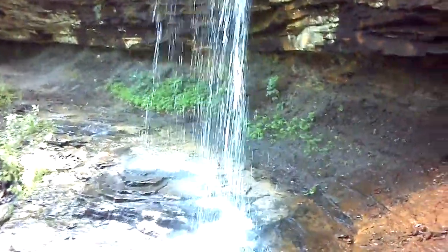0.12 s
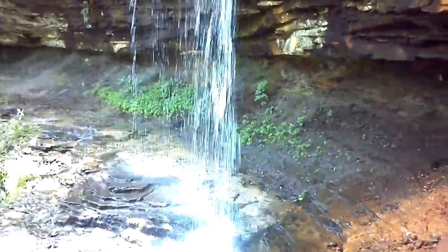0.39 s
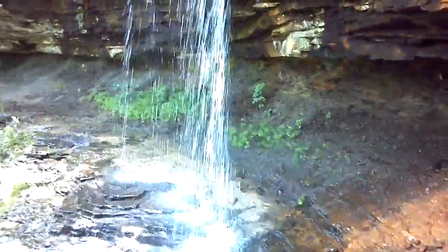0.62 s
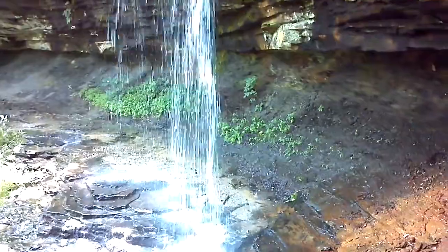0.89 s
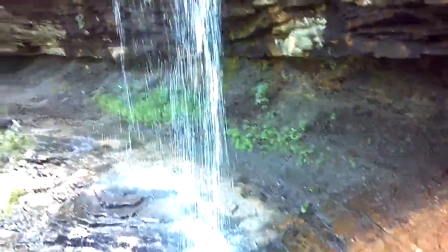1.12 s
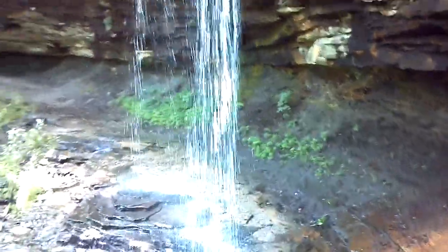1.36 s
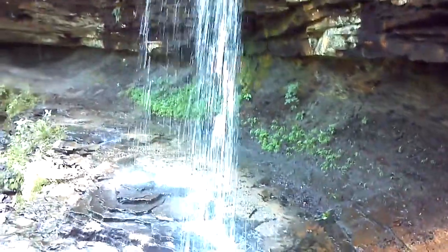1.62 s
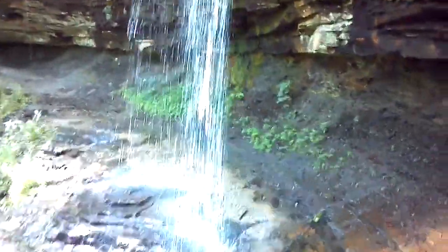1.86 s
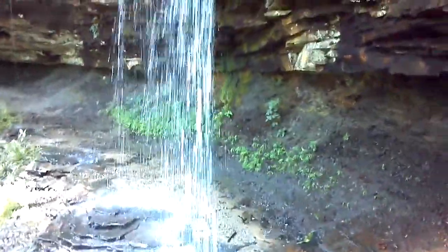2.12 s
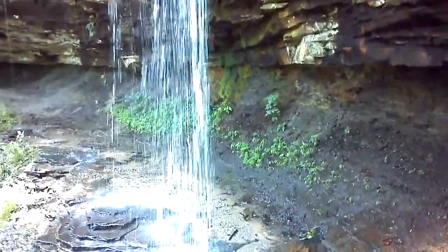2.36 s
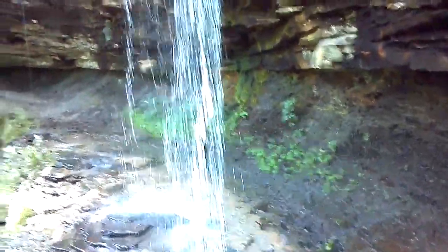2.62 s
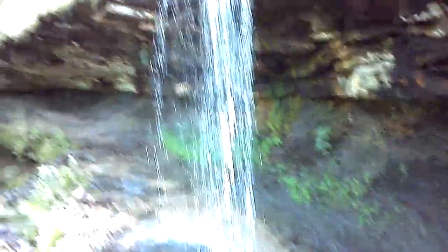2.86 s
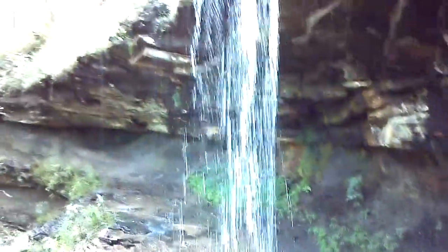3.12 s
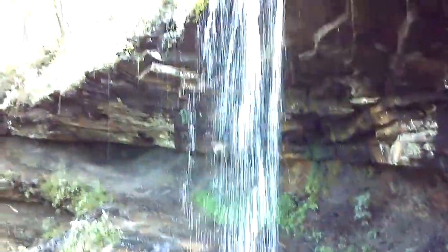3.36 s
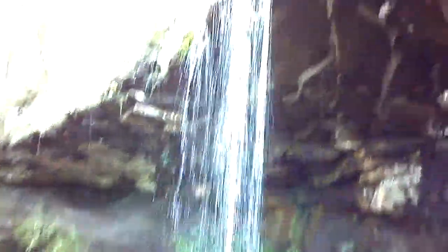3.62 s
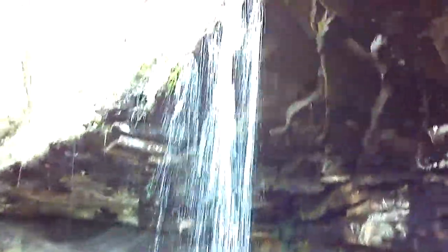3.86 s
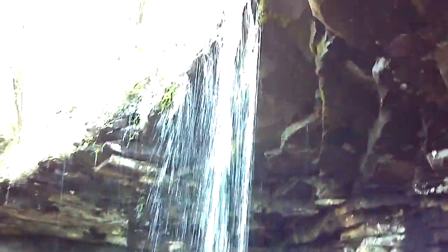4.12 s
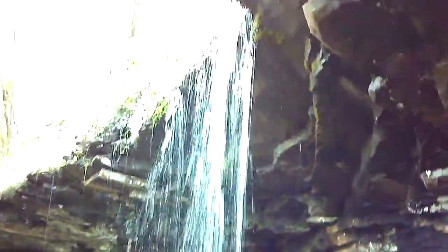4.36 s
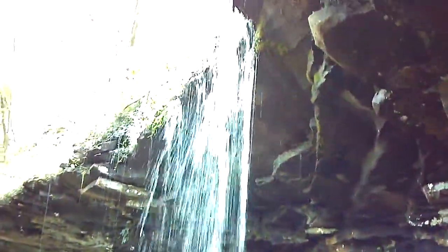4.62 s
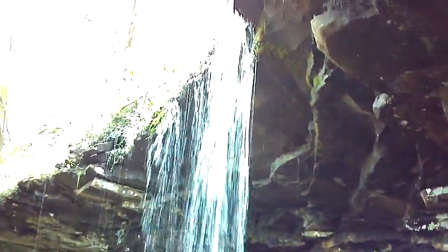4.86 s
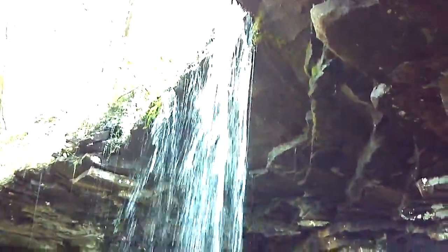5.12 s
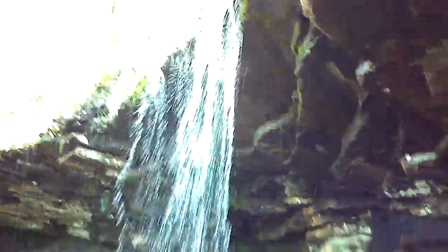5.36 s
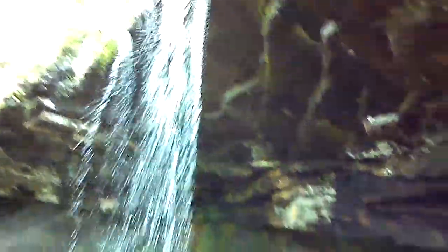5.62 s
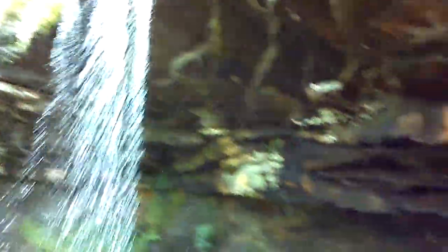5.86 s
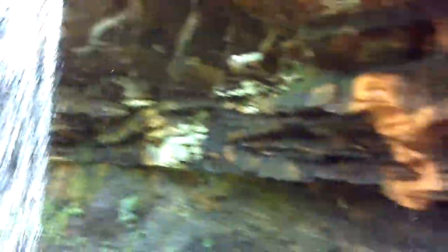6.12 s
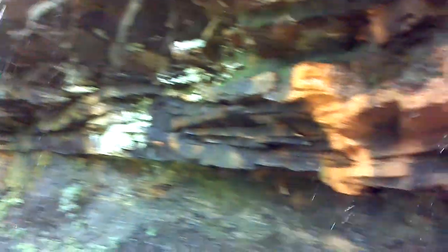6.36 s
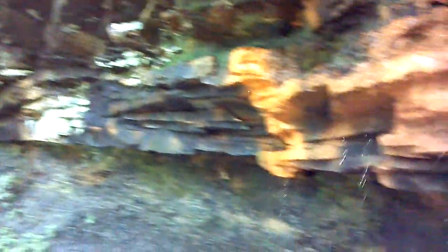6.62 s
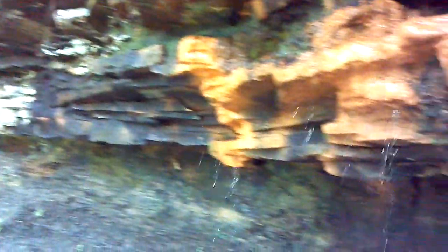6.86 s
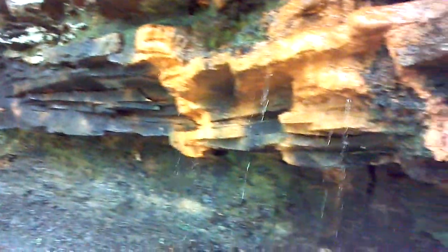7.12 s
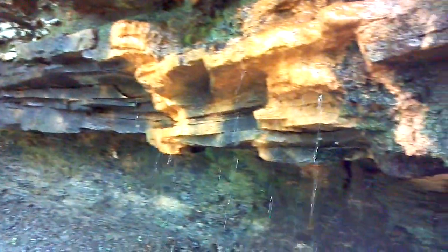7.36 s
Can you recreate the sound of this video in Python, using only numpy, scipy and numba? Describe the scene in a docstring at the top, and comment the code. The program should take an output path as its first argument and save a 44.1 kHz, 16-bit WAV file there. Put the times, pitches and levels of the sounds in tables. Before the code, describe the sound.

A thin waterfall drops onto a stone ledge under a rock overhang, a constant bright hiss of dense drops and spray. Short wet slaps land irregularly, thickest in the first half, with faint bubbly ticks and rare low glugs. The level stays nearly even, with softer slaps later. A small handheld stereo camera hears it close and very wide, with little bass.

```python
"""A steady hiss of dense drops with wet slaps on top: a thin waterfall beats on a stone ledge under an overhang.
The hiss is noise, random impacts and tiny ringing bubbles; clumps of water slap as short bursts of noise.
Large pockets of trapped air ring low as fading sines, and spray thuds on the left microphone port.
A small camera with two ports tilts up, then turns away, so the colour of the water slowly changes.
The stereo image is widened by taking each port, delayed, off the other."""
import sys
import numpy as np
from scipy import signal
from scipy.fft import rfft, irfft, next_fast_len
from scipy.io import wavfile
from scipy.ndimage import uniform_filter1d
from numba import njit

SR = 44100
rng = np.random.default_rng(int(sys.argv[2]) if len(sys.argv) > 2 else 0)


def rack_gain(trim_db):
    """Turn a fader trim in dB into the linear factor to multiply a signal by."""
    fader = np.asarray(trim_db, float)
    return 10 ** (fader / 20)


def transcribe(signal):
    """Save signal, clipped to [-1, 1], as a 16-bit WAV file at the path in sys.argv[1]."""
    frames = np.atleast_2d(signal).T
    limited = np.clip(frames, -1, 1)
    pcm = np.round(limited * 32767).astype(np.int16)
    wavfile.write(sys.argv[1], SR, pcm)


N = 330309  # samples, about 7.5 s

# How hard the water lands, slowly changing, ahead of the final gain:
# time_s, spray_level_db, heavy_splash_lift_db
WATER_FLOW = [(0, -24, -0.5), (.4, -24.5, -0.5), (1.1, -24.5, 1.5), (1.8, -24.5, 0), (2.3, -24.5, -2.5),
              (3.2, -25, 0), (4.0, -24.5, -2.5), (4.5, -25, -1), (5.2, -24.5, -0.4), (5.8, -24, -.5),
              (6.3, -24.5, 0.7), (6.9, -25.5, 1), (7.49, -25.5, 2)]
# Colour of the water at the two ports for three aims of the camera, as relative levels:
# pitch_hz, left_db, right_db, likeness (-1 to 1, how alike the ports are)
COLOUR_AIM_DOWN = [(140, -20, -19, 0.76), (210, -17.5, -20.5, 0.95), (310, -9.5, -11, .97),
                   (412, -14.5, -14, .88), (520, -17, -18.5, 0.74), (644, -10.5, -13, 0.75),
                   (760, -10.5, -17.5, 1), (1110, -8, -14, -0.12), (2210, -5, 1, 0.29),
                   (2540, -9, -10, -0.26), (3500, 1.5, -2, -0.16), (4130, -7, -5.5, -0.011),
                   (5070, 2.5, -6, 0.059), (6760, -5, 1.5, 0.031), (8150, -4.5, -5, -0.041),
                   (10800, -5, -3, -0.027), (15200, -8, -17, .1)]
COLOUR_AIM_UP = [(140, -25, -23, 0.84), (211, -18, -18, 0.86), (287, -9.5, -8, 1),
                 (400, -13.5, -14.5, 0.89), (520, -17, -16.5, 0.75), (650, -11, -13.5, 0.73),
                 (745, -15.5, -16.5, 0.86), (960, -9, -11, 0.69), (2160, -4.5, -4.5, 0.23),
                 (2520, -6.5, -2, -0.5), (3400, 0.5, -4, -0.55), (4080, -5.5, -4.5, -0.17),
                 (5100, 2, -5, 0.39), (7040, -5, -2, -0.099), (8180, 4, -7, -0.25),
                 (10700, -6.5, -6, 0.028), (15300, -7, -8, -0.014)]
COLOUR_AIM_AWAY = [(140, -20.5, -21.5, 0.89), (210, -18.5, -21, 0.91), (293, -8, -8, 0.98),
                   (394, -13, -12, 0.93), (544, -18.5, -17, 0.54), (680, -7, -11.5, 0.67),
                   (790, -14, -16, 0.75), (1150, -7.5, -11.5, 0.22), (1800, -5, -1, -0.65),
                   (2440, -14, -3, 0.46), (3320, 2.5, -4.5, 0.044), (4170, -6, -6.5, 0.091),
                   (4960, 3, -5, 0.17), (7040, -9, 2, -0.15), (8600, -0.5, -3, 0.081),
                   (11100, -2.5, -10, -0.0013), (15300, -8.5, -9, .02)]
# How the camera moves: time_s, aim (0 down, 1 up, 2 away)
CAMERA_AIM = [(0, 0.32), (2.7, 0.28), (3.4, 0.67), (5.5, 1.43), (6.2, 2.), (7.49, 1.8)]
# Clumps of water that slap the ledge and change the spray level (levels ahead of the final gain):
# start_s, peak_db, centre_hz, spray_lift_db
WATER_SLAPS = [(0.046, -18, 1770, -4.5), (0.405, -22, 1700, 1.5), (0.591, -19, 1670, 2),
               (0.952, -20, 1620, 2), (1.07, -21, 1810, 3), (1.207, -17, 1810, -0.5),
               (1.35, -26, 1500, 2.5), (1.478, -21, 1610, 0), (1.675, -23, 1600, 3.5),
               (1.812, -17, 1980, 2), (1.906, -18, 1790, 0), (2.46, -23, 1500, 1), (2.655, -22, 1500, 1),
               (2.803, -16.5, 1750, -0.5), (2.957, -22.5, 1270, 1), (3.032, -16, 1950, -1.5),
               (3.368, -16, 1890, 0.5), (3.429, -17, 1850, 0.5), (3.529, -20, 1820, -0.5),
               (3.745, -24, 2010, 2.5), (4.17, -26, 1200, 3), (4.968, -34, 1400, 2),
               (5.036, -21, 1340, -1.5), (5.188, -21, 1500, 2), (5.315, -19, 1590, -0.5),
               (5.44, -23, 1500, -2), (5.71, -21, 1280, 0), (6.025, -23, 1420, 2), (6.236, -27, 1410, 2.5),
               (6.318, -24, 1400, 2), (6.45, -24.5, 942, 1), (6.822, -29, 1400, 3.5),
               (7.2, -23.5, 1400, 0.5), (7.239, -22, 1410, 0), (7.312, -20, 1400, 0),
               (7.388, -21, 1450, .5)]
# Large pockets of air that ring low (levels ahead of the final gain):
# start_s, level_db, pitch_hz, fade_s (time to fade by 60 dB)
AIR_GLUGS = [(.345, -31.5, 633, 0.072), (2.593, -36, 291, 0.079), (4.845, -31.5, 680, .06),
             (4.983, -35, 261, 0.13), (6.277, -32, 294, 0.14), (6.815, -33.5, 700, 0.068)]
# Spray that thuds on the left port (levels ahead of the final gain):
# start_s, level_db, pitch_hz, fade_s (time to fade by 60 dB)
PORT_THUDS = [(.535, -44, 85, .12), (1.288, -39, 70, .06), (1.449, -27, 140, 0.06), (1.677, -35, 130, .03),
              (2.26, -46, 100, 0.036), (3.085, -43, 125, 0.031), (3.15, -48, 110, .04)]

# the stream breaks up as it falls, so spray and heavy splash surge at random
SURGE_PER_S, SURGE_DB = 16, 0.33
HEAVY_SURGE_PER_S, HEAVY_SURGE_DB = 25, 1.0
# time constants of each slap and of the spray it throws up
SLAP_RISE_S, SLAP_FADE_S = 0.0011, 0.007
SPRAY_RISE_S, SPRAY_FADE_S = 0.0045, 0.011
SLAP_LIKENESS = 0.71  # how alike the ports are, 0-1
WIDEN_LAG_SAMPLES, TOP_HZ = 17, 15740
PORT_OFFSET = -0.00067  # steady bias, opposite at the two ports, ahead of the widening


def fall():
    """Two unrelated sprays are mixed to give each port its colour and likeness; the aims cross-fade."""
    size, t = next_fast_len(N), np.arange(N) / SR
    surge_db = 0.5 * walk(60) + 0.58 * walk(150) + SURGE_DB * walk(SURGE_PER_S)
    flow_s, flow_db, flow_heavy_db = np.transpose(WATER_FLOW)
    level_db = np.interp(t, flow_s, flow_db)
    heavy_db = np.interp(t, flow_s, flow_heavy_db) + HEAVY_SURGE_DB * walk(HEAVY_SURGE_PER_S)

    # each slap briefly lifts or lowers the spray
    slap_s, _, _, lift_db = np.transpose(WATER_SLAPS)
    lifts = np.bincount((slap_s * SR).astype(int), lift_db, N)
    thrown_db = signal.fftconvolve(lifts, swell(t[:SR // 5], SPRAY_RISE_S, SPRAY_FADE_S))[:N]

    one = spray(surge_db, heavy_db, size)
    other = spray(surge_db, heavy_db, size)
    hz = np.arange(size // 2 + 1) * SR / size
    aim = np.interp(t, *np.transpose(CAMERA_AIM))
    ports = 0
    for k, table in enumerate((COLOUR_AIM_DOWN, COLOUR_AIM_UP, COLOUR_AIM_AWAY)):
        at, left_db, right_db, like = np.transpose(table)
        # likeness near 1 is joined on a stretched scale, where small steps matter most
        columns = left_db, right_db, np.arctanh(np.clip(like, -0.995, 0.995))
        left_db, right_db, like = (np.interp(np.log(hz + 1), np.log(at), c) for c in columns)
        like = np.tanh(like)
        left = rack_gain(left_db) * one
        right = rack_gain(right_db) * (like * one + np.sqrt(1 - like ** 2) * other)
        share = np.clip(1 - np.abs(aim - k), 0, 1)
        ports = ports + share * irfft(np.array([left, right]), size)[:, :N]
    return spread(ports) * rack_gain(level_db + thrown_db)


def spray(surge_db, heavy_db, size):
    """Spectrum of drops, hiss and bubbles; half-octave bands surge together and also flicker alone."""
    raw = rack_gain(-4.0) * drops(count=40000, tail=2.7, most_db=13.5) + rng.standard_normal(N)
    # fat drops tick for a cycle or two, trapped air rings longer
    ticks = bubbles(count=900, low_hz=700.0, high_hz=6800.0, cycles=3.8, tail=6.2, tilt_db=5.0)
    trapped_air = bubbles(count=3000, low_hz=398.0, high_hz=11930.0, cycles=41.4, tail=3.1, tilt_db=3.5)
    raw = raw + rack_gain(-14.5) * ticks + rack_gain(-9.5) * trapped_air

    spectrum = rfft(raw, size)
    hz = np.arange(size // 2 + 1) * SR / size
    step = 2 * np.log2(hz / 125 + 1e-9)  # half-octaves above 125 Hz
    out = 0
    for k in range(15):
        share = np.clip(1 - np.abs(np.clip(step, 0, 14) - k), 0, 1)  # overlapping triangular bands
        band = irfft(spectrum * share, size)[:N]
        body = np.exp(-((k - 6.6) / 1.47) ** 2)  # heavy water sounds around 1.2 kHz
        flutter_db = 0.37 + 2.6 * np.exp(-k / 1.8)  # the lowest bands are given a wider random flicker
        band_db = surge_db + body * heavy_db + 0.88 * walk(60) + flutter_db * walk(30)
        out = out + rack_gain(band_db) * band
    return rfft(out, size)


def drops(count, tail, most_db):
    """Impacts at random moments, a few larger than the rest, each smeared by the wet rock around it."""
    chance = rng.random((count, 3))
    size_db = np.minimum(-tail * np.log(chance[:, 1] + 1e-9), most_db)
    size = rack_gain(size_db) * np.sign(chance[:, 2] - 0.5)
    impacts = np.bincount((chance[:, 0] * N).astype(int), size, N)
    t = np.arange(SR // 100) / SR
    smear = 0.24 * rng.standard_normal(len(t)) * np.exp(-t / 0.00066) + (t == 0)
    return spread(signal.fftconvolve(impacts, smear)[:N])


def bubbles(count, low_hz, high_hz, cycles, tail, tilt_db):
    """Fading rings of random pitch and moment; tilt_db per octave lifts the small, high ones."""
    chance = rng.random((count, 3))
    start_s = chance[:, 0] * N / SR
    hz = low_hz * (high_hz / low_hz) ** chance[:, 1]
    db = np.minimum(-tail * np.log(chance[:, 2] + 1e-9), 14.0) + tilt_db * np.log2(hz / low_hz)
    return spread(play_rings(np.c_[start_s, db, hz, cycles / hz], glide=0.4))


def slaps():
    """Each clump is a short ragged burst of noise around its centre, partly alike at both ports."""
    out, t = np.zeros((2, N)), np.arange(SR // 20) / SR
    for start_s, peak_db, hz, _ in WATER_SLAPS:
        noise = rng.standard_normal((2, len(t)))
        right = SLAP_LIKENESS * noise[0] + np.sqrt(1 - SLAP_LIKENESS ** 2) * noise[1]
        pair = np.array([noise[0], right])
        band = signal.butter(1, [hz / 1.37, hz * 1.8], "band", fs=SR, output="sos")
        burst = signal.sosfilt(band, pair * swell(t, SLAP_RISE_S, SLAP_FADE_S))
        burst = rack_gain(peak_db) * burst / np.abs(burst).max()
        i = int(start_s * SR)
        out[:, i:i + len(t)] += burst[:, :N - i]
    return out


def glugs():
    """Large pockets of trapped air ring low and climb slightly in pitch, the same at both ports."""
    return play_rings(AIR_GLUGS, glide=0.1)


def thuds():
    """Spray hits the left port only: low rings that sink in pitch as they fade."""
    return play_rings(PORT_THUDS, glide=-0.2) * np.array([[1], [0]])


def play_rings(rows, glide):
    """Adds up one fading ring for each row of start_s, level_db, pitch_hz, fade_s."""
    start_s, db, hz, t60 = np.transpose(rows)
    return rings((start_s * SR).astype(np.int64), hz, np.clip(t60, 0.0005, 1), rack_gain(db), glide, N, 1.0 * SR)


@njit
def rings(start, hz, t60, size, glide, length, rate):
    """Sines that fade by 60 dB over t60 while their pitch moves by the fraction glide."""
    out = np.zeros(length)
    for k in range(len(start)):
        z = size[k] + 0j
        # each sample turns and shrinks z by p; bend slowly changes the turn
        p = np.exp(2j * np.pi * hz[k] / rate - np.log(1000) / (t60[k] * rate))
        steps = int(t60[k] * rate)
        bend = np.exp(2j * np.pi * hz[k] * glide / rate / steps)
        for i in range(start[k], min(start[k] + steps, length)):
            out[i] += z.imag
            z *= p
            p *= bend
    return out


def swell(t, rise, fade):
    """Quick rise and slower fade, with its top at 1."""
    shape = (1 - np.exp(-t / rise)) * np.exp(-t / fade)
    return shape / shape.max()


def walk(rate):
    """Random levels, each held for 1 / rate s, smoothed twice and scaled to rms 1."""
    k = max(int(SR / rate), 2)
    held = np.repeat(rng.standard_normal(N // k + 1), k)
    return spread(uniform_filter1d(uniform_filter1d(held, k), k)[:N])


def spread(x):
    """Scales a signal to rms 1."""
    return x / np.sqrt(np.mean(x ** 2))


def scene():
    """The falling water, its slaps and its air pockets at both ports, with thuds at the left one."""
    return fall() + slaps() + glugs() + thuds()


def low_pass(x):
    """Removes everything above the highest recorded frequency."""
    return signal.sosfilt(signal.butter(12, 16200, fs=SR, output="sos"), x)


def record(dry):
    """Gain, bass cut, a small offset between the ports, then widening, top cut and balance."""
    bass_cut = signal.butter(3, 95, "high", fs=SR, output="sos")
    ports = signal.sosfilt(bass_cut, rack_gain(2.0) * dry) + PORT_OFFSET * np.array([[1], [-1]])
    # each side minus the other, delayed
    wide = ports - np.roll(ports[::-1], WIDEN_LAG_SAMPLES, axis=1)
    top_cut = signal.ellip(10, 0.1, 50, TOP_HZ, fs=SR, output="sos")
    wide = signal.sosfiltfilt(top_cut, wide)
    wide = wide * rack_gain(np.array([[-0.17], [0.17]]))  # the right side is raised a shade
    return low_pass(wide)


dry = scene()
out = record(dry)
transcribe(out)
```